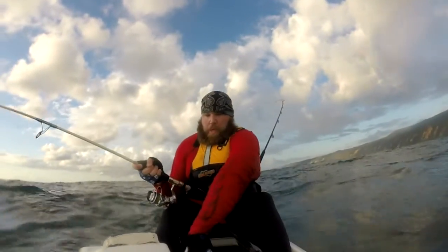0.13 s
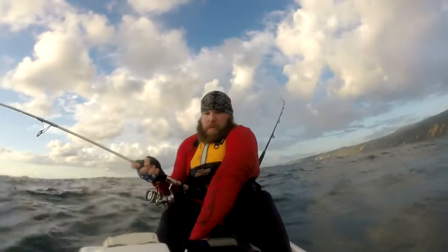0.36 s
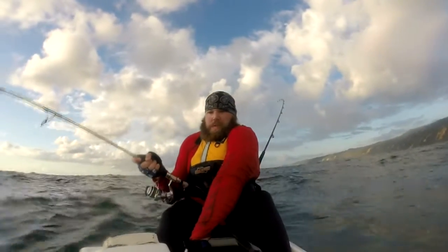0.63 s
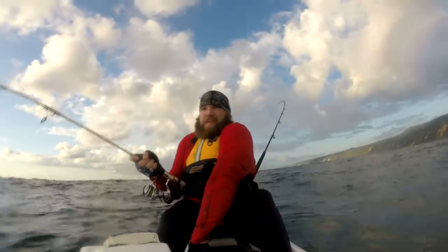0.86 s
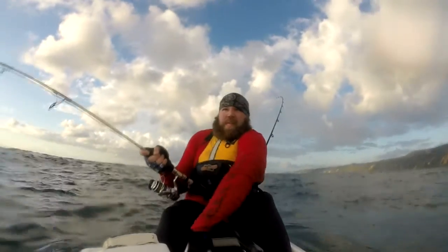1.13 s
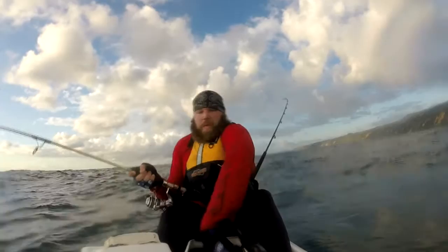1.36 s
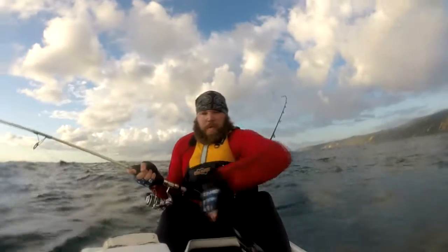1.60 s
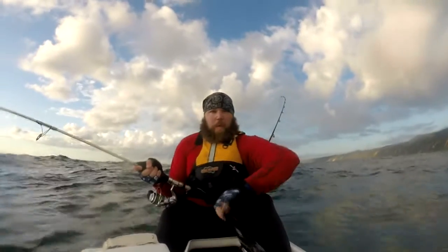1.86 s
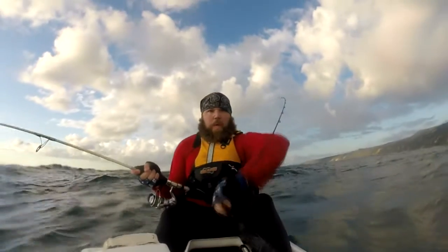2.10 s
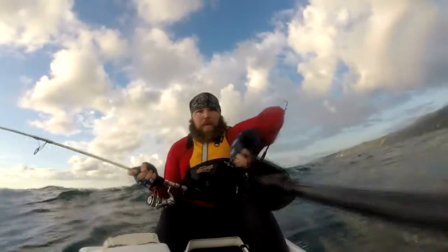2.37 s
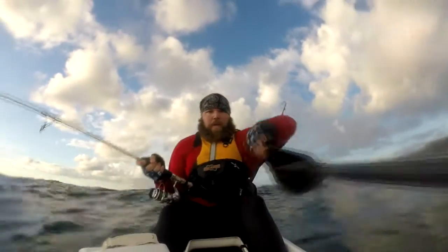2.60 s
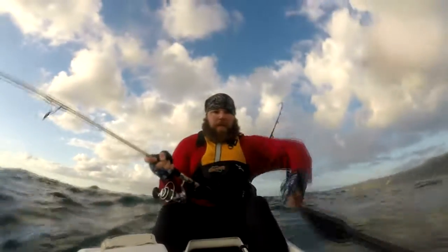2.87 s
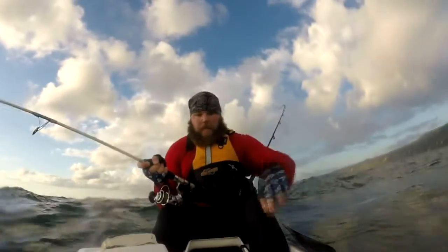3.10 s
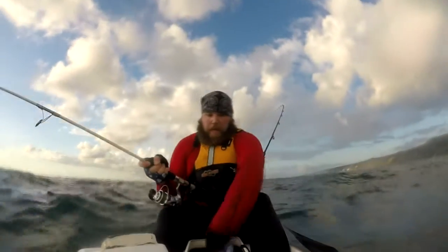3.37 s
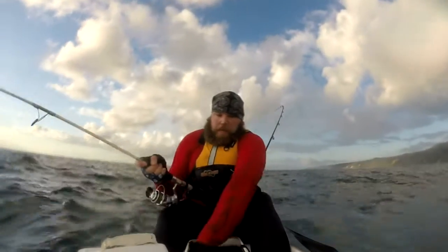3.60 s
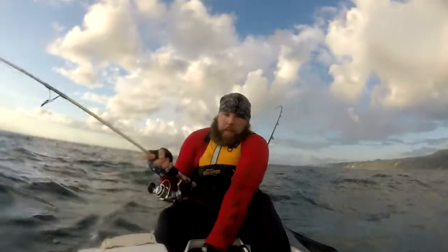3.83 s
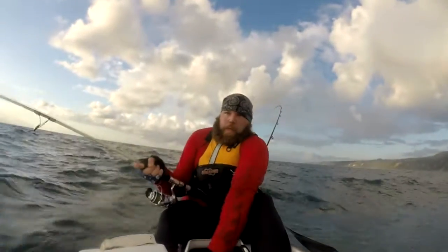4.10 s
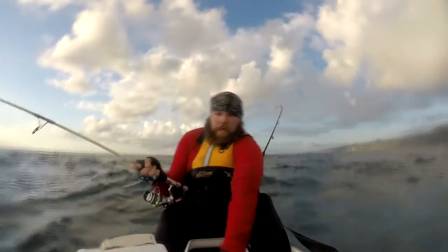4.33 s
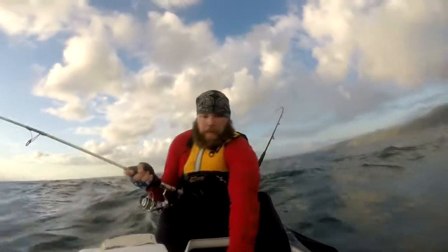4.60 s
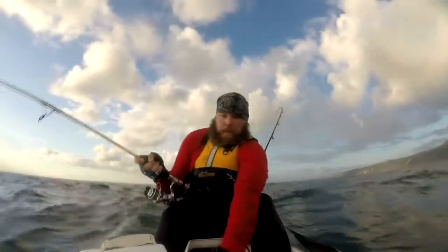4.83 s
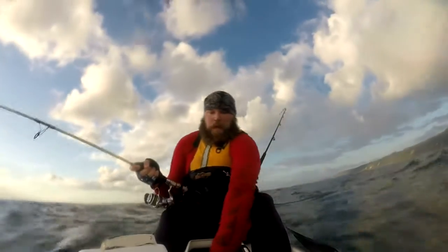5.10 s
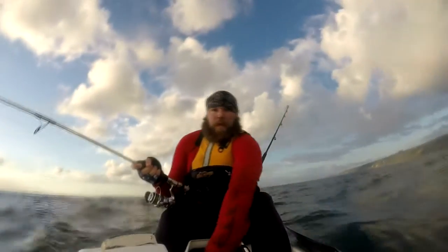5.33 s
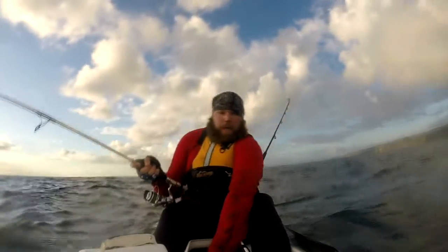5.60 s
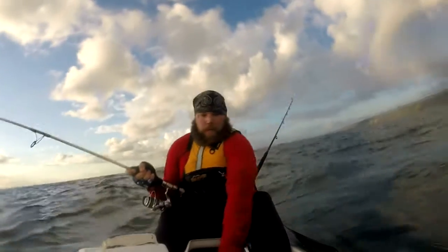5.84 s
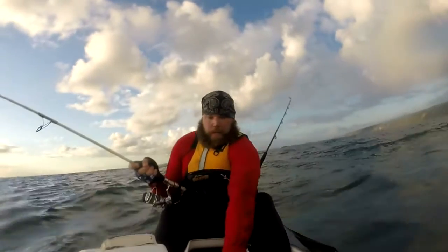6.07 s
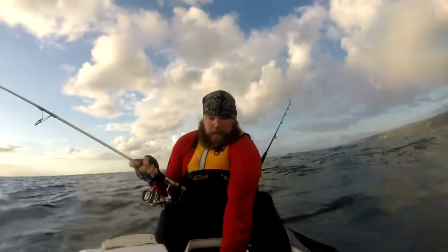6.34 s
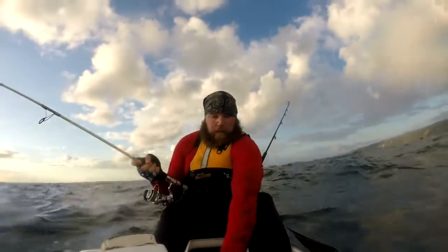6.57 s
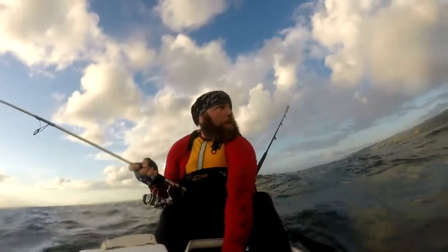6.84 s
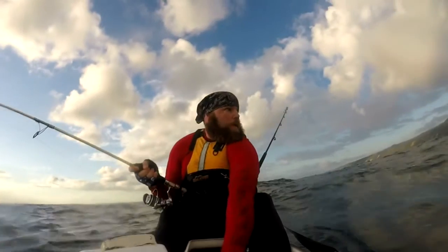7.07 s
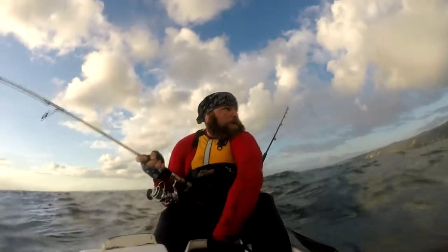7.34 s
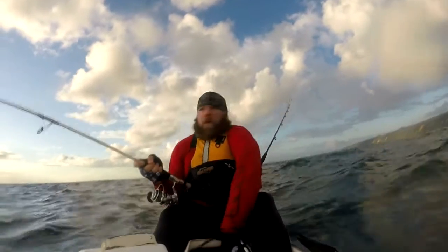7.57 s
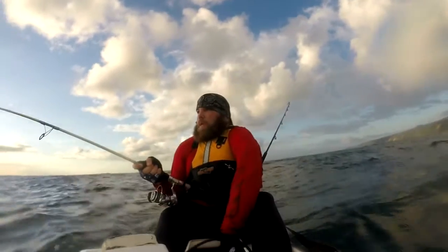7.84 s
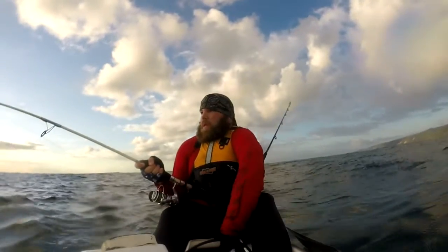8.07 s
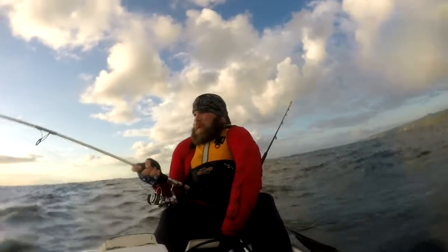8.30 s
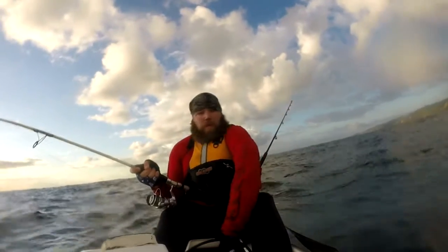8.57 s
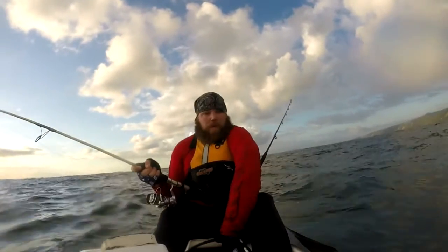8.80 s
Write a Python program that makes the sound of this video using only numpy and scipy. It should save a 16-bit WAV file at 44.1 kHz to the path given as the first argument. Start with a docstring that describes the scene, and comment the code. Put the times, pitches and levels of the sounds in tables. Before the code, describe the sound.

A microphone fixed to a plastic kayak hears choppy sea mostly through the hull. Small knocks and plops open, with fast reel ticking. From 1.3 to 3 seconds hard slaps, booms and watery drags hit, ending with a paddle click and thin ringing. Further irregular thumps and scrapes follow, easing after 7 seconds into faint plops and hiss.

```python
"""A camera fixed to a plastic kayak on a choppy sea hears mostly through the hull, whose modes ring when struck.
From the first tenth of a second water and gear slap, knock and drag on the shell, and trapped air pockets plop;
a fishing reel ticks in short runs. The blows are hardest between 1.3 s and 3 s, when a paddle clicks once.
Blows and drags go on until about 8 s and thin out into a few last plops. Throughout, small waves lap, the hull
throbs deeply and the sea hisses faintly; after loud blows the camera turns its gain down."""
import sys
import numpy as np
from scipy import signal
from scipy.fft import rfft, irfft, next_fast_len
from scipy.io import wavfile
from scipy.ndimage import uniform_filter1d, minimum_filter1d, map_coordinates

SR = 44100
rng = np.random.default_rng(int(sys.argv[2]) if len(sys.argv) > 2 else 0)


def int16_out(signal):
    """Quantize to a 16-bit WAV file."""
    q = np.round(np.clip(np.atleast_2d(signal).T, -1, 1) * 32767)
    wavfile.write(sys.argv[1], SR, q.astype(np.int16))


def invert_db(x):
    """Field ratio 10**(x/20) for x, a level in decibels (scalar or array-like)."""
    u = np.asarray(x, float) / 20
    return 10 ** u


N = 394254

# groups of hull modes that one kind of contact drives: (low edge f/Hz, high edge f/Hz, filter order)
BOOM, KNOCK, SLAP, CRACK = (40, 190, 1), (200, 450, 1), (450, 2300, 4), (2600, 15000, 2)


def unit(x):
    """Normalisation: the signal scaled to rms 1."""
    return x / np.sqrt(np.mean(x ** 2) + 1e-20)


def curve(rows):
    """Linear interpolation: one value per sample from (t/s, value) rows."""
    return np.interp(np.arange(N) / SR, *np.transpose(rows))


def wobble(rate):
    """Band-limited fluctuation: a smooth random curve through rate knots a second."""
    knots = rng.standard_normal(int(N * rate / SR) + 4)
    return map_coordinates(knots, [np.arange(N) * rate / SR])


def filtered(x, response):
    """Linear filtering: the spectrum of x times a complex response of frequency."""
    m = next_fast_len(N + SR // 2)
    return irfft(rfft(x, m) * response(np.fft.rfftfreq(m, 1 / SR)), m)[..., :N]


def ring(modes, f):
    """Modal superposition: damped resonances (f/Hz, width/Hz, gain/dB) add with alternating sign."""
    total = 0
    for k, (centre, width, db) in enumerate(modes):
        resonance = 1j * f * width / (centre * centre - f * f + 1j * f * width)
        total = total + (-1) ** k * invert_db(db) * resonance
    return total


def patchy(depth_db):
    """Non-stationary noise: its spectrum varies in small random patches of time and frequency."""
    z = signal.stft(rng.standard_normal(N + 512), nperseg=256)[2]
    field = uniform_filter1d(uniform_filter1d(rng.standard_normal(z.shape), 2, 0), 8, 1)
    return unit(signal.istft(z * invert_db(depth_db * unit(field)), nperseg=256)[1][:N])


def laps(rate, spread_db, t60):
    """Shot noise: sudden starts at random moments and sizes, each decaying exponentially."""
    starts = (rng.random(N) < rate / SR) * invert_db(spread_db * rng.uniform(-1.9, 1, N))
    decay = invert_db(-60 * np.arange(SR // 20) / SR / t60)
    return unit(np.convolve(starts, decay)[:N])


def hull(force, edges):
    """Forced modal vibration of the shell; dispersion of bending waves delays the bass against the treble."""
    # modes of the hull: f/Hz, width/Hz, relative gain/dB
    hull_modes = [(62.8, 9.2, -15), (83, 13.5, -6), (121.2, 7.6, 4.5), (222, 63, -7.5), (299.9, 16.9, 5),
                  (449.6, 170, -9), (479.4, 41, -4), (587.4, 57, -0.5), (738.7, 67.4, -1), (943, 137, -8.5),
                  (1210, 210, -7.5), (1563, 656, -11), (2054, 794, -15.5), (2790, 185, 4.5),
                  (3530, 450, 2.5), (4406, 1250, -11), (7170, 1200, -29)]
    lag_s = 0.005  # group delay is lag_s * (sqrt(300 Hz / f) - 0.6)
    low, high, order = edges
    modes = [mode for mode in hull_modes if low < mode[0] < high]
    band = signal.butter(order, (low, high), "band", fs=SR, output="sos")
    force = signal.sosfilt(band, force)

    def response(f):
        dispersion = np.exp(-4j * np.pi * lag_s * (np.sqrt(300 * f) - .3 * f))
        return ring(modes, f) * dispersion

    return filtered(force, response)


def struck(force, pulse, edges):
    """Linearity: the hull's answer, scaled so that one pulse of size 1 peaks at 1."""
    one_answer = hull(np.pad(pulse, (SR // 10, N))[:N], edges)
    return hull(force, edges) / np.abs(one_answer).max()


def blows():
    """Impact excitation: each blow is a soft push on the low modes and a ragged burst on the high ones."""
    # blows: t/s, slap level before the band gains/dB, then knock and crack level against the slap/dB
    blow_rows = [(0.117, -28, -25, -15), (0.129, -16, -18, -22), (0.175, -25, -19, -23),
                 (0.237, -22, -10.5, -30), (0.345, -29, -16.5, -25), (0.94, -30.5, -21, -27),
                 (1.314, -13, -14, -23.5), (1.42, -12.5, -12, -39), (1.592, -22.5, -12.5, -28.5),
                 (1.821, -33, -14, -30), (2.008, -12.5, -11, -34), (2.199, -11.5, -21.5, -28.5),
                 (2.376, -24, -7, -50), (2.609, -9, -5, -28.5), (3.02, -12.5, -23, -22.5),
                 (3.04, -14, -13, -28), (3.472, -21.5, -18, -28.5), (4.374, -21, -3.5, -22),
                 (4.693, -25.5, -11, -30), (4.901, -26, -10.5, -27), (5.005, -32, -7, -37),
                 (5.469, -28.5, -4.5, -42), (6.29, -28, -22, -46), (6.605, -14, -31, -27),
                 (6.615, -23, -22.5, -25), (6.657, -27.5, -28, -26), (6.715, -25.5, -14, -50),
                 (6.81, -25, -22, -25), (6.969, -25.5, -6.5, -27.5), (7.01, -21.5, -9.5, -25.5),
                 (7.268, -31.5, -8, -54), (7.629, -34.5, -18, -36), (7.675, -35.5, -22, -42),
                 (7.777, -25, -18, -22), (7.964, -42, -3, -42), (8.084, -61.5, 2, -27)]
    push_s, burst_t60 = 0.0024, 0.058
    t = np.arange(SR // 20) / SR
    push = np.sin(np.pi * np.clip(t / push_s, 0, 1))
    fade = invert_db(-60 * t / burst_t60)
    force = np.zeros((4, N + len(t)))  # boom, knock, slap, crack
    for s, db, knock_db, crack_db in blow_rows:
        burst = fade * np.sign(rng.standard_normal((2, len(t))))
        parts = [push, push, unit(burst[0]), unit(burst[1] * fade)]
        gains = db + np.array([[1.02 * knock_db], [knock_db], [0], [crack_db]])  # the boom follows the knock
        force[:, round(s * SR):][:, :len(t)] += invert_db(gains) * parts
    force = force[:, :N]
    rough = unit(fade * np.cos(t * t * 2e6))  # reference pulse for the two high bands
    boom = invert_db(11.5) * struck(force[0], push, BOOM)
    knock = invert_db(13.5) * struck(force[1], push, KNOCK)
    slap = invert_db(15.0) * struck(force[2], rough, SLAP)
    crack = invert_db(19) * struck(force[3], rough, CRACK)
    return boom + knock + slap + crack


def swells(spans, rise, fall, base_db):
    """Incoherent addition: (start, end, start dB, end dB) spans with flanks in dB/s add in power to a base."""
    t = np.arange(N) / SR
    power = invert_db(2 * base_db)
    for start, end, first_db, last_db in spans:
        end = max(start, end)  # an end before the start gives a span that only swells and dies away
        corners = [start - 1, start, end, end + 1]
        db = np.interp(t, corners, [first_db - rise, first_db, last_db, last_db - fall])
        near = np.abs(t - np.clip(t, start, end)) < 1
        power = power + invert_db(2 * db) * near
    return 10 * np.log10(power)


def levels():
    """Superposed envelopes: wash, fizz and boom levels in dB, strokes and surges rising out of the lapping."""
    # how busily small waves lap the shell between strokes: t/s, wash level/dB
    chop = [(0.42, -41), (0.58, -58), (1.0, -43), (1.6, -43.5), (1.95, -55.5), (2.45, -44.5), (2.95, -45),
            (3.34, -60), (3.5, -43.5), (4.7, -36), (5.42, -48.5), (5.75, -42), (6.5, -47), (7.1, -45.5),
            (7.9, -55.5), (8.4, -66.5)]
    # water and gear dragging on the shell: start t/s, end t/s, start level/dB, end level/dB,
    # fizz level against the wash/dB
    strokes = [(0.083, 0.265, -29.5, -32.5, -22), (0.702, 0.754, -42.5, -45, -15.5),
               (1.275, 1.35, -21, -26.5, -19.5), (1.383, 1.496, -27.5, -25, -25.5),
               (2.107, 2.34, -19.5, -29.5, -16), (2.634, 2.86, -22.5, -24, -18.5),
               (3.034, 3.092, -26, -30.5, -23.5), (3.472, 3.504, -29, -35.5, -27),
               (3.587, 3.669, -24, -27, -24), (3.714, 3.752, -25, -32, -20),
               (3.815, 4.128, -29, -28.5, -21.5), (4.24, 4.348, -30.5, -23, -13.5),
               (4.386, 4.453, -16.5, -21.5, -24.5), (7.72, 7.845, -40, -30, -22)]
    # heavy water pushing the shell: start t/s, end t/s (an end before the start makes a brief surge
    # that only swells and dies away), boom level/dB
    surges = [(0.143, 0.26, -22), (1.304, 1.36, -19), (1.429, 1.49, -14), (2.021, 2.17, -18),
              (2.386, 2.42, -22.5), (2.635, 2.75, -10), (3.037, 3.095, -9), (3.473, 3.53, -22.5),
              (3.913, 3.967, -25), (4.067, 4.18, -22.5), (4.391, 4.46, -11), (4.703, 4.82, -17.5),
              (5.481, 5.482, -20.5), (5.681, 5.73, -21.5), (6.164, 6.32, -26.5), (6.547, 6.2, -18.5),
              (7.011, 7.09, -13.5), (7.972, 6.8, -25.5), (8.09, 8.094, -33.5)]
    chop_fizz_db, chop_boom_db = -20, 9  # against the wash of the lapping
    stroke_rise, wash_fall, fizz_fall = 670, 430, 930  # dB/s: the fizz dies sooner than the wash
    surge_rise, surge_fall = 1100, 185  # dB/s
    chop_db = curve(chop)
    washes = [row[:4] for row in strokes]
    fizzes = [(start, end, first + rel, last + rel) for start, end, first, last, rel in strokes]
    pushes = [(start, end, db, db) for start, end, db in surges]
    wash_db = swells(washes, stroke_rise, wash_fall, chop_db)
    fizz_db = swells(fizzes, stroke_rise, fizz_fall, chop_db + chop_fizz_db)
    boom_db = swells(pushes, surge_rise, surge_fall, chop_db + chop_boom_db)
    return wash_db, fizz_db, boom_db


def drag():
    """Random excitation: grainy noise and small laps drive the high modes, heavy water the low ones."""
    wash_db, fizz_db, boom_db = levels()
    uneven = np.clip(-wash_db / 20 - 1, .3, 1.5)  # hard strokes are steady, light ones come in lumps
    small_laps = 2.5 + 1.08 * uneven * laps(rate=45, spread_db=11.5, t60=0.039)
    grain = invert_db(uneven * 2.5 * wobble(16) + 2.64 * wobble(70)) * small_laps
    wash = unit(hull(grain * patchy(depth_db=2.5), SLAP))
    drops = 1.5 + 0.45 * uneven * laps(rate=45, spread_db=11, t60=0.013)  # droplets tick in the fizz
    fizz = unit(hull(drops * grain * patchy(depth_db=2.5), CRACK))
    knock = unit(hull(np.sqrt(grain) * rng.standard_normal(N), KNOCK))
    boom = unit(hull(rng.standard_normal(N), BOOM))
    boom_power = np.abs(uniform_filter1d(boom ** 2, size=SR // 30))
    boom = unit(boom / (0.067 + boom_power) ** 0.14)  # a steady push rings evenly
    knock_db = 0.47 * wash_db + 0.52 * boom_db - 6
    high = invert_db(wash_db) * wash + invert_db(fizz_db) * fizz
    return high + invert_db(knock_db) * knock + invert_db(boom_db) * boom


def plops():
    """Bubble resonance: each trapped air pocket swells, rings a few unsteady cycles and dies."""
    # air pockets: t/s, f/Hz, level at the envelope's peak/dB
    pockets = [(0.072, 630, -21.5), (0.096, 1610, -28), (0.2, 1900, -28), (0.268, 656, -24.5),
               (0.387, 818, -20), (2.867, 577, -13), (2.867, 1306, -18), (3.62, 1845, -22.5),
               (5.474, 617, -24.5), (5.74, 1010, -35), (7.75, 1390, -32), (7.792, 670, -20),
               (7.825, 660.6, -21), (8.19, 1144, -44), (8.228, 3630, -50), (8.262, 1415, -45)]
    peak_s = 0.0036  # time to the envelope's peak
    s, hz, db = np.transpose(pockets)[..., None]
    k = np.arange(SR // 20)
    u = k / SR / peak_s
    steps = rng.standard_normal((len(s), len(k)))
    drift = uniform_filter1d(0.13 * np.cumsum(steps, axis=1), size=SR // 1000)  # radians
    envelope = invert_db(db) * u * np.exp(1 - u)
    rings = envelope * np.sin(2 * np.pi * hz * k / SR + drift)
    places = (s * SR).astype(int) + k
    return np.bincount(places.ravel(), rings.ravel(), N)[:N]


def reel():
    """Ratchet impulses: the spool speeds up and slows, the pawl drops on each tooth, harder when fast."""
    # runs of the ratchet: start t/s, nominal end t/s, nominal ticks a second/(1/s)
    runs = [(0.193, 0.331, 62), (0.522, 0.855, 51), (1.162, 1.332, 25), (2.169, 2.284, 53),
            (2.58, 2.727, 42), (3.113, 3.431, 30), (3.586, 3.839, 29), (4.216, 4.466, 48),
            (4.786, 4.97, 64), (5.207, 5.29, 67), (7.234, 7.451, 85), ]
    # the ratchet's ring: f/Hz, width/Hz, gain/dB
    pawl_modes = [(6670, 210, 3), (8060, 110, -1), (11500, 2400, -18.5)]
    ticks = np.zeros((len(pawl_modes), N))
    for start, end, rate in runs:
        count = max(1, round((end - start) * rate))
        u = (np.arange(count) + .5) / count
        chance = rng.standard_normal((count, 4))
        progress = 0.67 * u + 0.21 * np.arccos(1 - 2 * u) / np.pi  # slow, fast, slow
        s = start + (end - start) * progress + 0.13 * chance[:, 3] / rate
        tick_db = 0.053 * rate - 27.5 - 5.4 * (2 * u - 1) ** 2 + 1.8 * chance[:, :3].T
        ticks[:, (s * SR).astype(int)] = invert_db(tick_db)
    return sum(filtered(x, lambda f: ring([mode], f)) for x, mode in zip(ticks, pawl_modes))


def paddle():
    """Free decay: the paddle, laid down, clicks brightly in the air and its shaft rings on thinly."""
    # ring of the shaft: f/Hz, level/dB, t60/s
    shaft_modes = [(497, -27.5, 0.53)]
    click_s, click_db, click_t60 = 3.02, -38, 0.026
    t = np.arange(N) / SR - click_s
    on = t >= 0
    click = invert_db(click_db - 60 * on * t / click_t60) * rng.standard_normal(N)
    shaft = sum(invert_db(db - 60 * on * t / t60) * np.sin(2 * np.pi * hz * t) for hz, db, t60 in shaft_modes)
    return on * (click + shaft)


def heave():
    """Resonant filtering: noise through a doubled 25.6 Hz resonance throbs below the hull's first mode."""
    # throb of the whole boat: t/s, rms level/dB
    heave_levels = [(0.0, -24.5), (0.74, -47), (1.48, -19), (1.7, -30.5), (3.0, -19.5), (3.46, -36.5),
                    (7.28, -33), (8.18, -46)]
    throb = filtered(rng.standard_normal(N), lambda f: ring([(25.6, 13.6, 0)], f) ** 2)
    return invert_db(curve(heave_levels)) * unit(throb)


def sea():
    """Spectral shaping: noise for far water and the microphone's own hiss, muffled by the housing."""
    # spectrum of the hiss: f/Hz, relative level per Hz/dB
    spectrum = [(35, -44), (60, -10.5), (117, -0.5), (257, -3), (8030, -30.5), (15000, -41.5)]
    sea_db = -55  # rms
    hz, db = np.transpose(spectrum)
    hiss = filtered(patchy(depth_db=2.0), lambda f: invert_db(np.interp(np.log(f + 1), np.log(hz), db)))
    return invert_db(sea_db) * unit(hiss)


def scene():
    """Superposition: all sources add at one microphone."""
    return (blows() + drag() + plops() + reel() + paddle() + heave() + sea())[None]


def roll_off(x):
    """The treble ends steeply here."""
    return signal.sosfilt(signal.butter(12, 15140, fs=SR, output="sos"), x)


def record(dry):
    """Dynamic compression: peaks over -6 dB duck the gain; then a low-pass and soft saturation."""
    top_hz, duck_s = 15140, .12  # low-pass edge; time constant of the gain's fall and recovery
    over_db = np.maximum(20 * np.log10(np.abs(dry[0]) + 1e-9) + 6, 0)
    held_db = -minimum_filter1d(-over_db, size=SR // 20, origin=SR // 41)  # peaks held for about 50 ms
    keep = np.exp(-1 / (duck_s * SR))
    duck_db = signal.lfilter([1 - keep], [1, -keep], 2 * held_db)
    ducked = filtered(dry * invert_db(-duck_db), lambda f: f < top_hz)
    rounded = ducked / (1 + ducked ** 4) ** (1 / 4)  # the loudest peaks are rounded off
    return roll_off(rounded)


dry = scene()
out = record(dry)
int16_out(out)
```